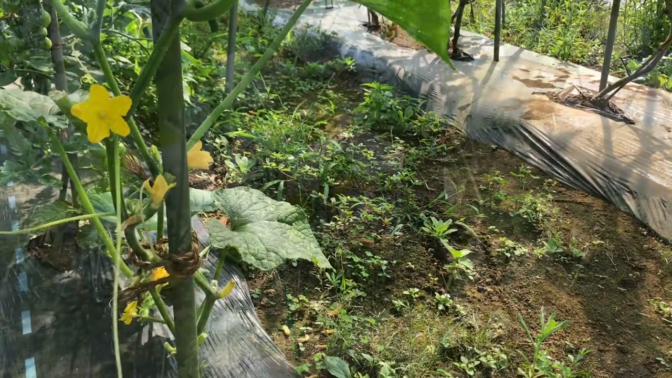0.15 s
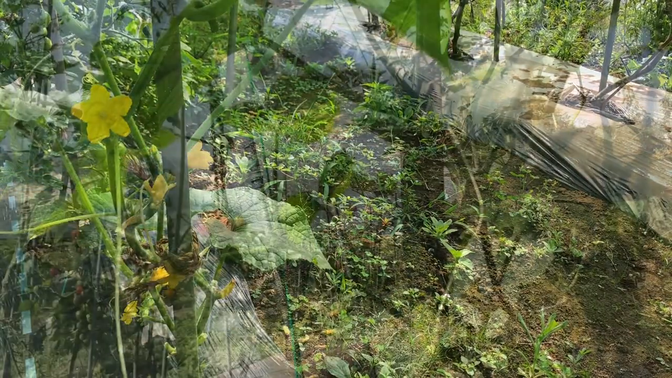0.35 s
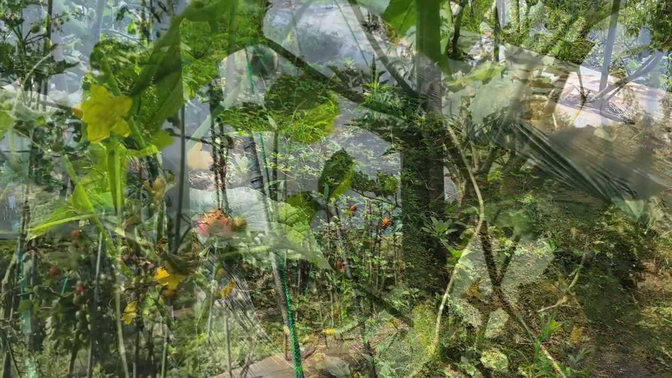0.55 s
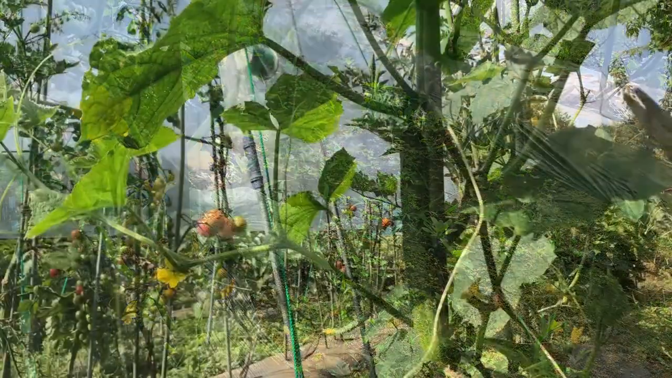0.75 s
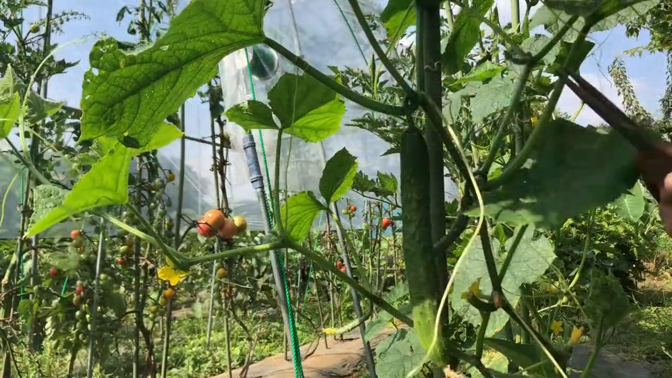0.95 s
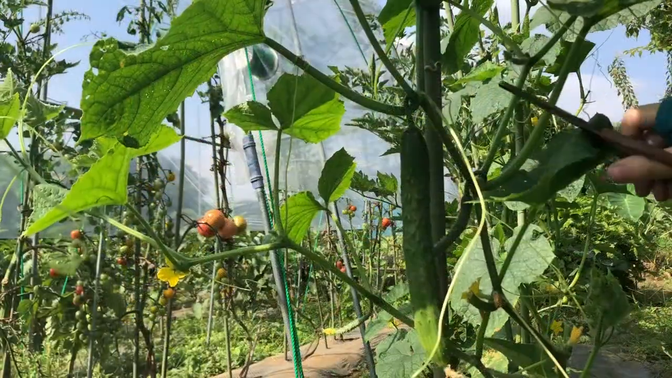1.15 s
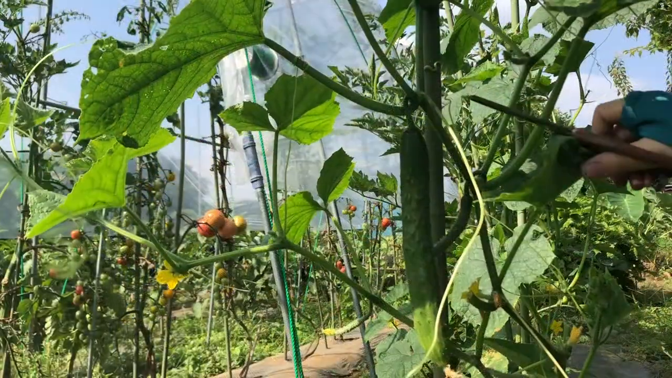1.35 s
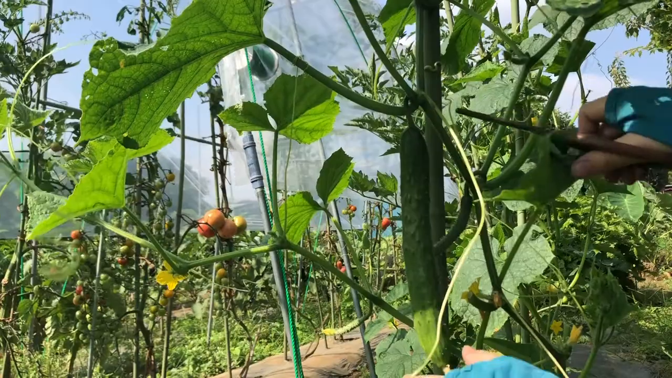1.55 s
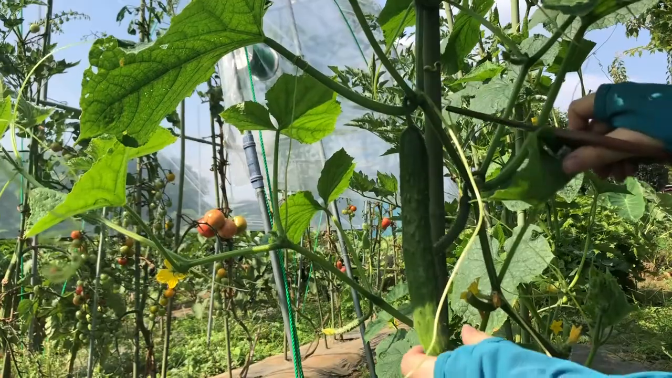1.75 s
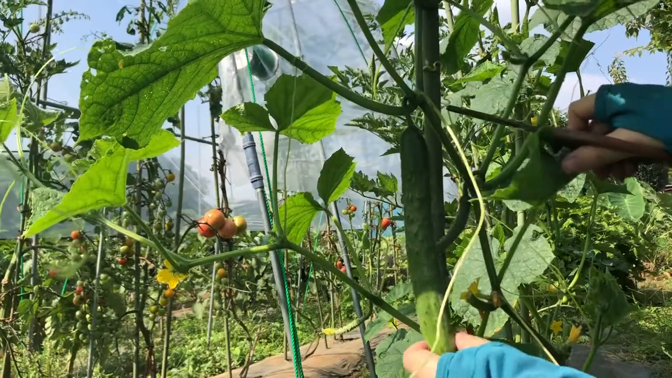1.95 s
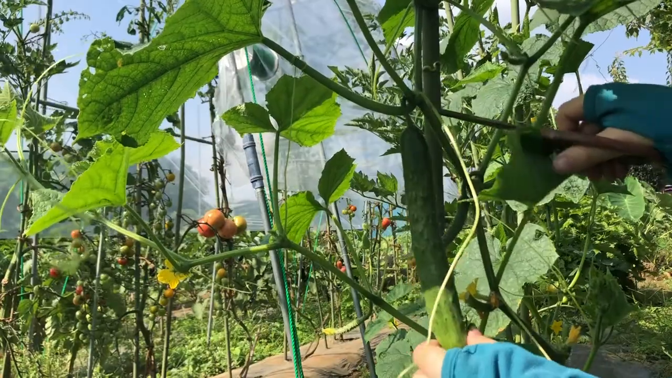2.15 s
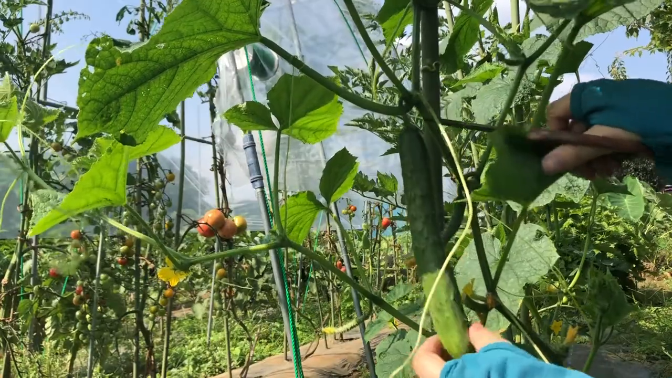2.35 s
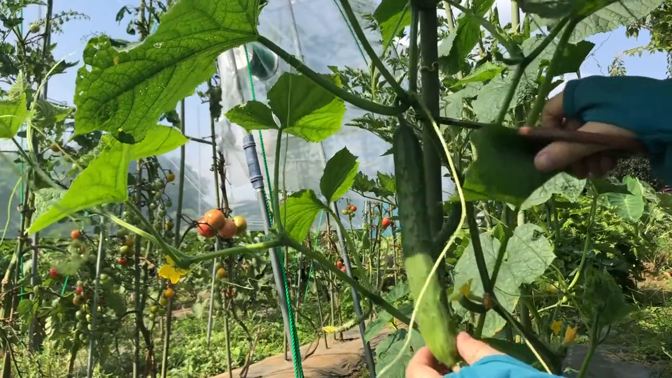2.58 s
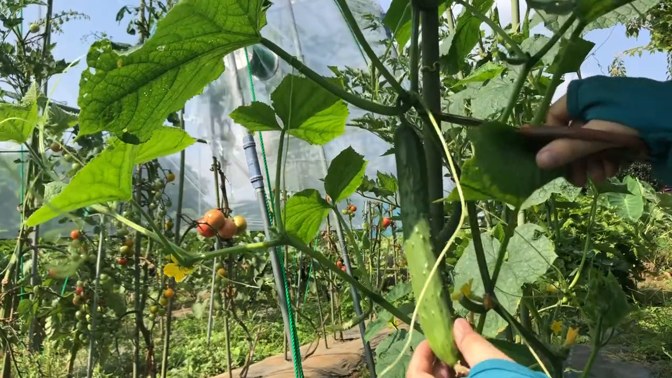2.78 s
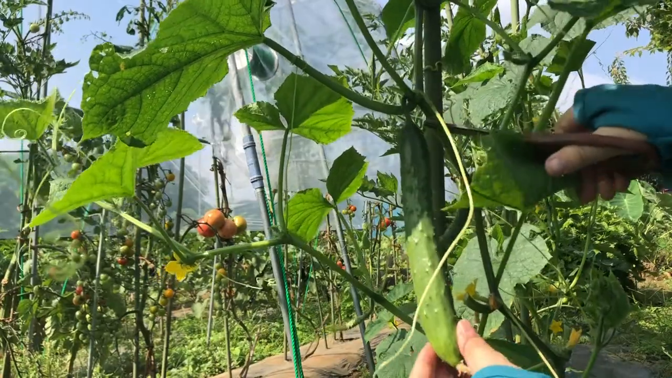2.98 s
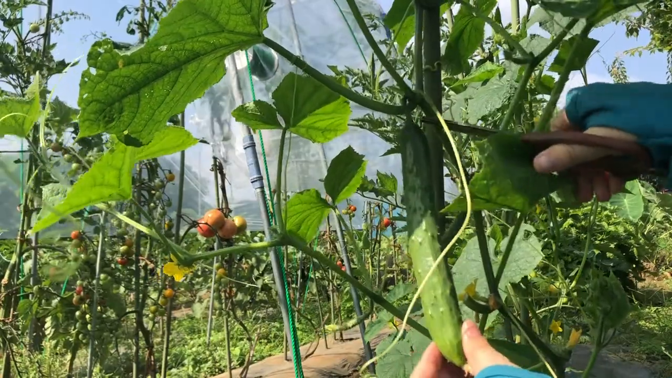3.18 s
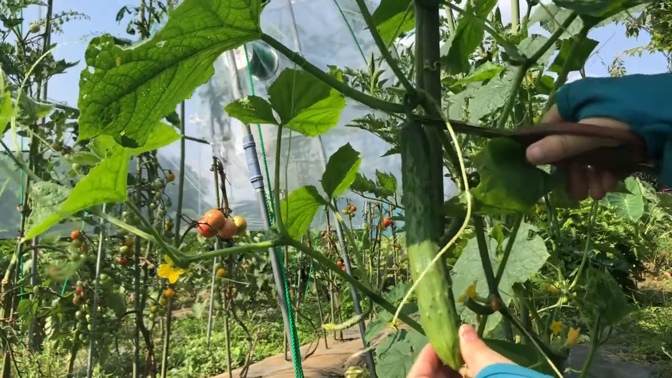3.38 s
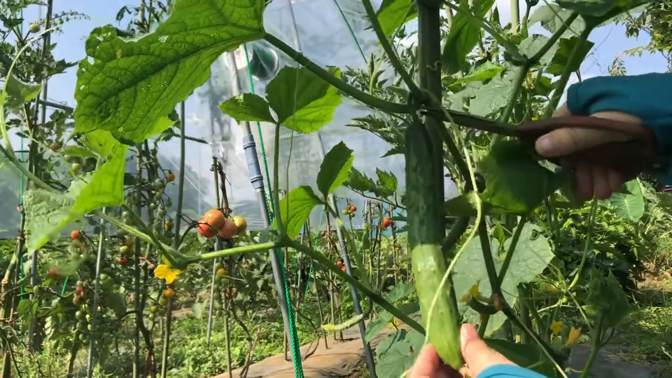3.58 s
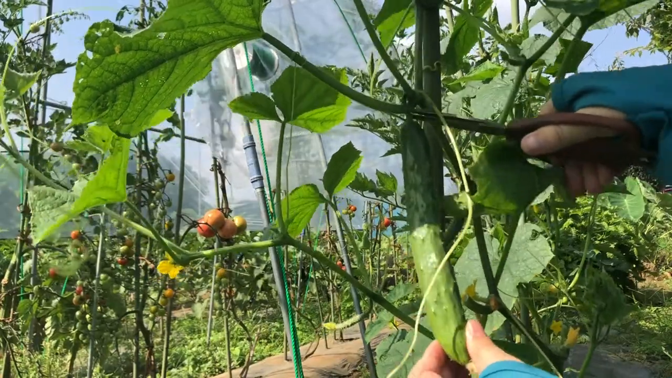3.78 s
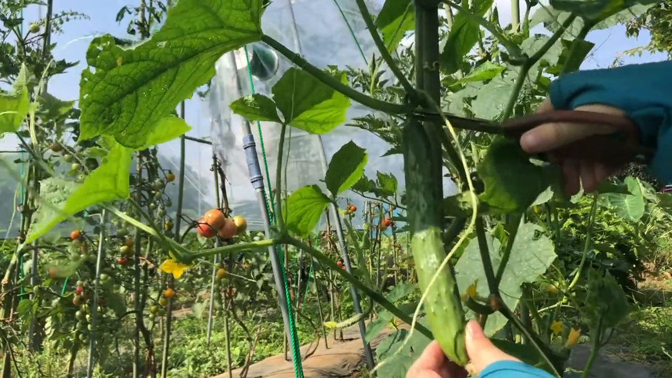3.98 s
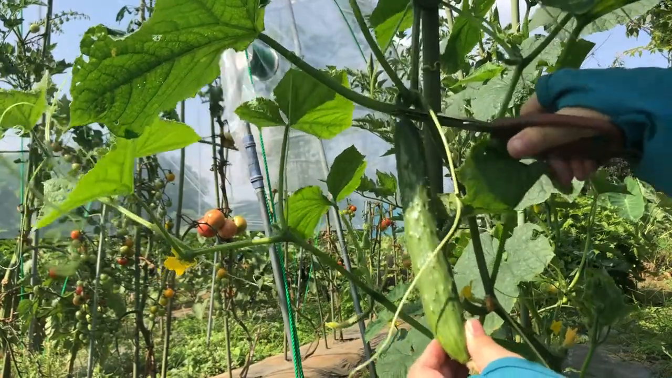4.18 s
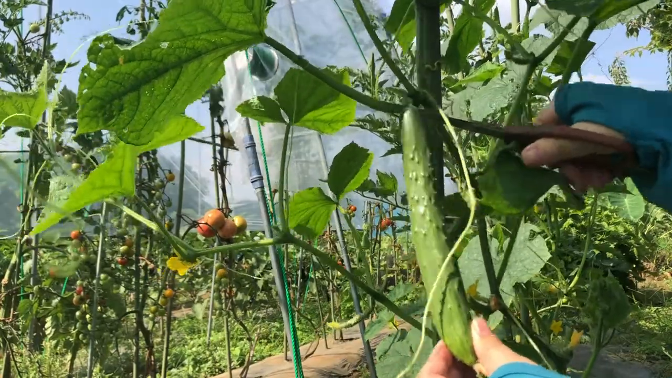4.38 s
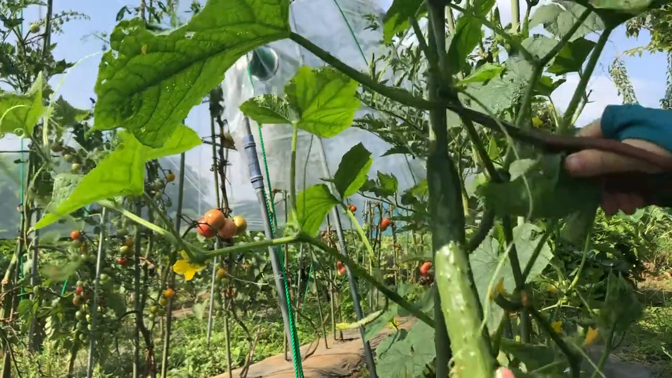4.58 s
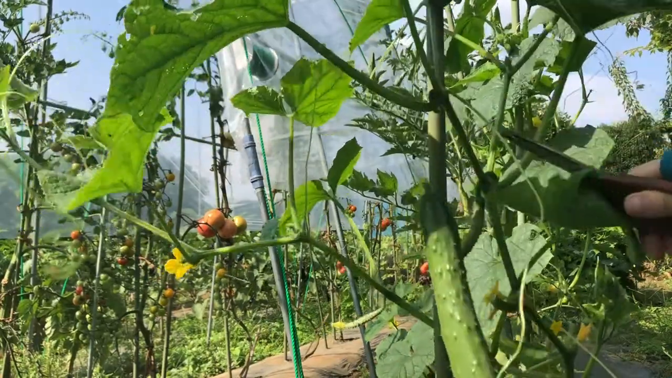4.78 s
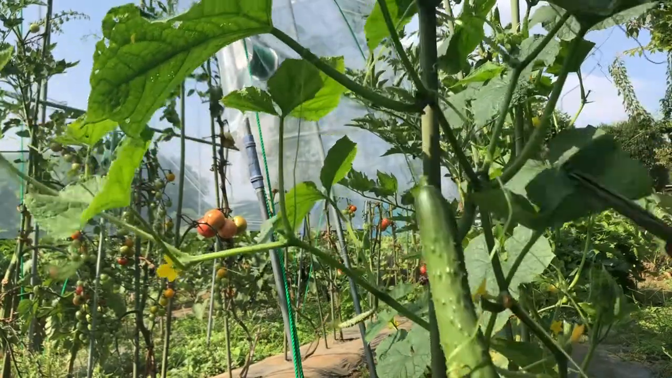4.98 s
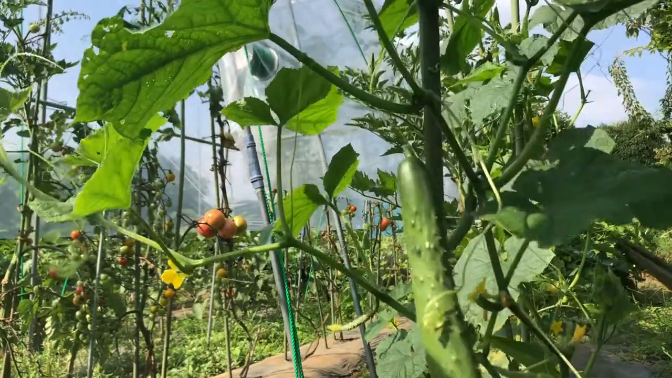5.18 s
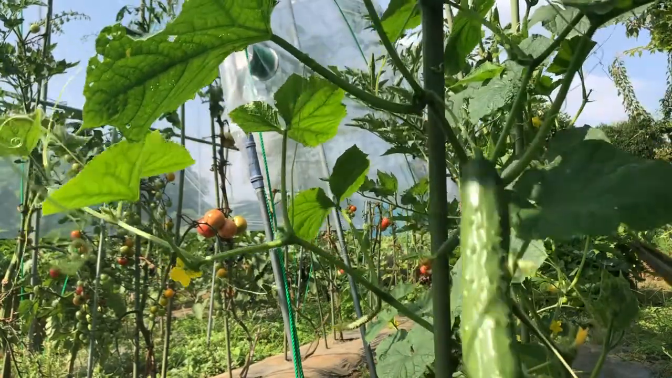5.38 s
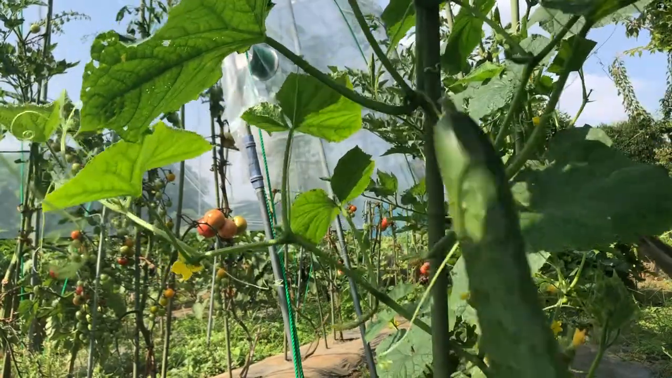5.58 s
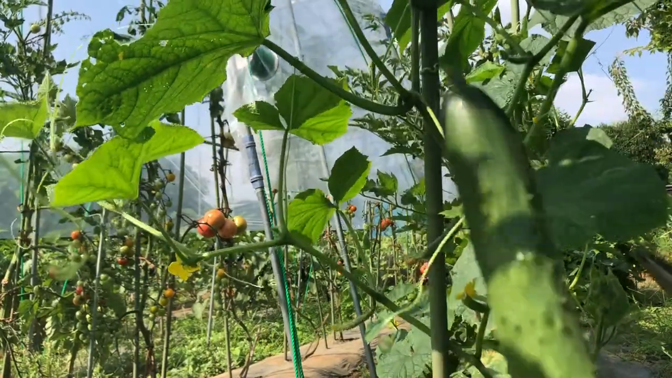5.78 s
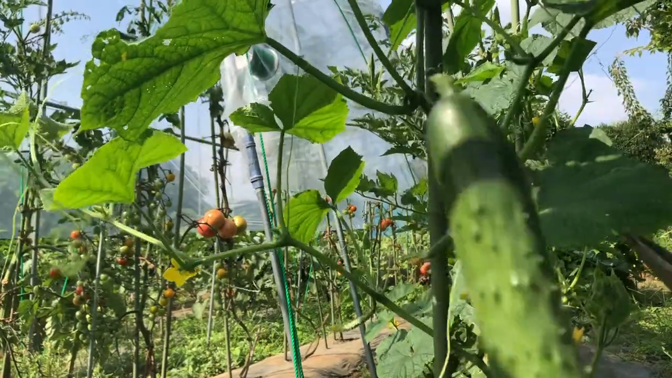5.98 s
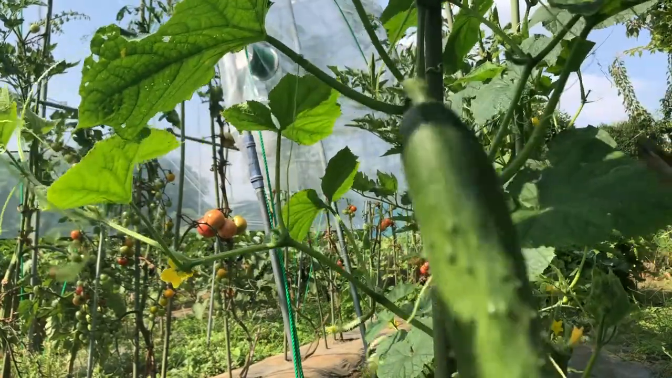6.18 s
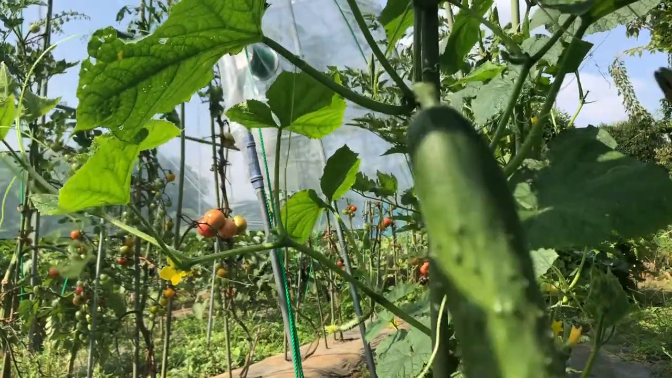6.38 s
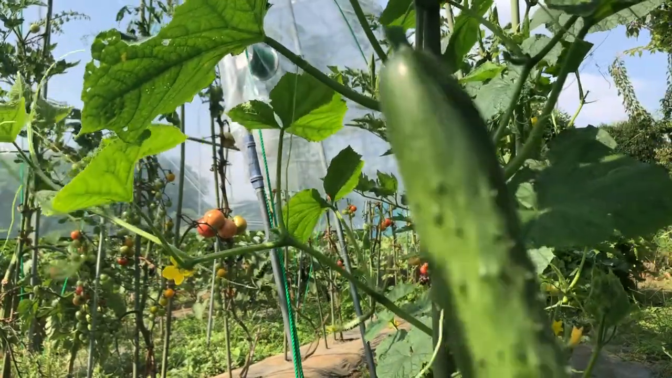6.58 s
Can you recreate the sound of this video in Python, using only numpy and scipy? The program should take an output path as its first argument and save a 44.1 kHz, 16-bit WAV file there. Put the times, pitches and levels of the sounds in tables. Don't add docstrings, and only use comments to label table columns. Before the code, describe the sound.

Faint coo and distant road under constant insect chirring, dry rustling of leaves and creaking vine, a single loud metallic snip, then quiet.

```python
import sys
import numpy as np
from scipy import signal
from scipy.fft import rfft, irfft, next_fast_len
from scipy.io import wavfile
from scipy.ndimage import uniform_filter1d, map_coordinates

SR = 44100
rng = np.random.default_rng(int(sys.argv[2]) if len(sys.argv) > 2 else 0)


def boost_factor(decibels):
    exponent = np.asarray(decibels, float) / 20
    return 10 ** exponent


def transcribe(signal):
    frames = np.atleast_2d(signal).T
    limited = np.clip(frames, -1, 1)
    pcm = np.round(limited * 32767).astype(np.int16)
    wavfile.write(sys.argv[1], SR, pcm)


N = 292691
STEP = 20

# frequency in Hz, level in dB.
PUMP_LINES = [(200, -59.5), (168, -63.5), (75, -66)]
# frequency in Hz, density in dB per Hz.
CICADA_COLOUR = [(2470, -67), (4200, -41), (4670, -27), (5080, -13.5), (5160, -12.5), (5640, -3.5),
                 (8170, -0.5), (9280, -7), (10300, -22.5), (10800, -30), (11500, -46), (15000, -68),
                 (22000, -120)]
# frequency in Hz, density in dB per Hz.
RUMBLE_COLOUR = [(20, -50), (32, -24), (43, -3), (102, -1), (133, -4.5), (155, -4), (185, -7), (214, -9),
                 (226, -14), (257, -10), (330, -23), (430, -48)]
# frequency in Hz, density in dB per Hz.
TYRE_COLOUR = [(250, -11), (450, -7.5), (1000, 2), (1700, -1), (2200, -6.5), (3200, -22)]
# middle moment in seconds, level in dB, time to lose 10 dB in seconds.
TYRE_SWELLS = [
    (.3, -66, 0.58),
    (6.08, -70.5, 0.2),
]
# frequency in Hz, density in dB per Hz.
WASH_COLOUR = [(150, -29), (250, -1.5), (400, -2.5), (900, -8.5), (2000, -14), (4300, -20.5),
               (10000, -22.5), (13000, -29.5), (15800, -29)]
# start in seconds, length in seconds, pitch in Hz, level in dB.
COO_NOTES = [(.525, .045, 975, -62), (.585, .025, 1010, -69), (.645, .02, 1200, -70),
             (.68, .065, 1060, -61), (.755, .045, 1130, -64), (.848, .015, 1170, -65)]
# start in seconds, length in seconds, level in dB.
LEAF_STIRS = [(.25, .08, -79), (.43, 0.045, -84), (.57, 0.023, -77), (.66, 0.097, -78), (0.813, 0.018, -78),
              (1.93, .12, -80), (5.026, 0.19, -78), (5.38, .004, -78), (5.836, 0.084, -78),
              (6.012, 0.1, -75)]
# start in seconds, length in seconds, level in dB, pressure in dB.
LEAF_STROKES = [(.095, 0.091, -72.5, 5.3), (.93, 0.19, -70, 0.5), (1.13, .04, -73, 6),
                (1.18, 0.044, -70.5, 8.5), (1.29, 0.15, -75, 3), (1.55, 0.14, -71, -2),
                (1.7, 0.051, -67, 0), (2.055, 0.13, -58, -3.5), (2.235, 0.057, -59.5, -3.5),
                (2.345, 0.076, -58, -7.5), (2.46, .24, -66, -3.5), (2.78, 0.096, -64.5, 3.5),
                (2.89, .16, -74, -2), (3.14, 0.062, -66, 0), (3.23, 0.036, -69, -5),
                (3.28, 0.055, -65.5, 2), (3.39, 0.11, -79, -2), (3.53, 0.1, -67.5, 0),
                (3.69, 0.11, -74, 0.5), (3.89, 0.046, -77, -4), (3.99, 0.071, -70, 1.5),
                (4.11, 0.15, -66.5, 4.5), (4.36, 0.1, -74.5, 2), (4.475, 0.024, -68.5, -2),
                (4.52, 0.1, -74.5, 4), (4.655, 0.056, -68, 3), (4.73, .08, -64.5, -1),
                (4.81, 0.078, -61.5, 0.5), (4.915, 0.077, -62, 5.5)]
# frequency in Hz, density in dB per Hz.
HAIR_COLOUR = [(3000, -30), (6000, -10.5), (9000, 2.5), (12000, 1), (14500, -0.5), (16500, 2.5)]
# frequency in Hz, density in dB per Hz.
LEAF_COLOUR = [(2400, -13.5), (3300, -10.5), (3800, -0.5), (4300, 0), (5200, 0.5), (7000, -4.5),
               (10000, -36)]
# frequency in Hz, density in dB per Hz.
STALK_COLOUR = [(400, -30), (700, -1.5), (1200, -1.5), (2000, 0), (2800, -3.5), (3400, -8), (4300, -48)]
# time in seconds, peak in dB, ring in Hz.
LEAF_TICKS = [(0.978, -45.5, 1670), (1.707, -44, 3070), (3.455, -49, 2700), (2.0407, -31, 5070),
              (3.67, -50, 2800), (2.1066, -37, 4690), (2.244, -44.5, 3200), (2.281, -36, 4700),
              (2.4119, -35, 5080), (2.428, -40, 3910), (2.693, -35, 5000), (2.819, -42, 4200),
              (2.8399, -41, 4800), (3.168, -50, 4050), (3.2974, -41, 4000), (3.4017, -48, 4200),
              (3.558, -41, 3990), (3.6227, -37, 4700), (3.7544, -46, 4440), (4.0692, -47.5, 2430),
              (4.1314, -33, 4760), (4.3874, -49.5, 3880), (4.4263, -48, 5170), (4.494, -48.5, 1950),
              (4.558, -44, 3930), (4.5853, -40.5, 4060), (4.8214, -46, 3600), (4.919, -46, 4830),
              (4.938, -45, 2800), (4.968, -36, 2880)]
# start in seconds, end in seconds, level in dB.
VINE_CREAKS = [(2.048, 2.201, -48), (2.799, 2.92, -49), (3.439, 3.85, -50), (3.992, 4.12, -50),
               (4.34, 4.651, -51), (4.81, 5.0, -47)]
# time in seconds, level in dB.
FIBRE_TEAR = [(4.2228, -75), (4.2242, -38), (4.2300, -42), (4.2310, -25), (4.2326, -24), (4.2330, -31),
              (4.2375, -37), (4.242, -60)]
# frequency in Hz, density in dB per Hz.
TEAR_COLOUR = [(350, -51), (600, -11), (2030, -6), (3210, -3), (6000, -4), (9740, -1.5), (11500, -2),
               (15400, -14), (16500, -26)]
# time in seconds, level in dB, frequency in Hz, cycles to fade 20 dB.
BLADE_CONTACTS = [(4.23052, -8, 11000, 2.5), (4.23072, -2, 7600, 3.5), (4.23088, 3, 6200, 3.5),
                  (4.23080, -9.5, 2130, 5.5), (4.23082, -7, 11600, 8), (4.2309, -10, 4020, 7),
                  (4.2308, -18, 1500, 3), (4.23080, -12.5, 2420, 4), (4.2309, -10, 5250, 4),
                  (4.2312, -9, 9200, 5), (4.2308, -14, 15100, 8), (4.2319, -12, 6500, 4),
                  (4.2322, -12, 7600, 4)]
# frequency in Hz, width in Hz, level in dB.
STEEL_MODES = [(2200, 400, -4), (4130, 260, -2), (6460, 1100, -13), (7800, 230, 17), (7710, 140, -20),
               (8900, 410, 13), (9700, 220, -11), (10330, 200, -12), (10600, 270, 10), (11600, 550, 15.5),
               (13700, 310, 6), (15000, 280, 5)]
# frequency in Hz, density in dB per Hz.
ECHO_COLOUR = [(290, -47), (500, -5), (1200, -23), (2230, -7), (5310, -13), (6000, -1), (11300, -5),
               (15400, -18), (15800, -48)]


def unit(x):
    return x / np.sqrt(np.mean(x ** 2) + 1e-20)


def wobble(rate):
    knots = rng.standard_normal(int(N * rate / SR) + 4)
    return map_coordinates(knots, [np.arange(N) * rate / SR])


def filtered(x, response):
    m = next_fast_len(N + 8192)
    return irfft(rfft(x, m) * response(np.fft.rfftfreq(m, 1 / SR)), m)[:N]


def hiss(colour, source=None):
    f, db = np.transpose(colour)
    if source is None:
        source = rng.standard_normal(N)

    def gain(hz):
        return boost_factor(np.interp(np.log(hz + 1), np.log(f), db, left=-120, right=-120))
    return unit(filtered(source, gain))


def held(start, length, rise, fall):
    t = np.arange(0, N, STEP) / SR - start
    return np.minimum(0, np.minimum(rise * t, fall * (length - t)))


def filled(coarse):
    return np.interp(np.arange(N), np.arange(0, N, STEP), coarse)


def gliding_level(early_db, late_db):
    return np.interp(np.arange(N) / SR, (.55, .95), (early_db, late_db))


def pump():
    t = np.arange(N) / SR
    return sum(boost_factor(db + 1.5 * wobble(4)) * np.sin(2 * np.pi * hz * t + .35 * wobble(6))
               for hz, db in PUMP_LINES)


def cicadas():
    pulse_hz = 520 + 6 * wobble(5.6)
    buzz = 1 + .12 * np.sin(2 * np.pi * np.cumsum(pulse_hz) / SR)
    return boost_factor(gliding_level(-57, -53.5) + .25 * wobble(9.8)) * buzz * hiss(CICADA_COLOUR)


def traffic():
    t = np.arange(N) / SR
    rumble = boost_factor(gliding_level(-51, -55) - 2.5 + .6 * wobble(5)) * hiss(RUMBLE_COLOUR)
    swell = sum(boost_factor(db - 10 * ((t - s) / width) ** 4) for s, db, width in TYRE_SWELLS)
    tyres = swell * hiss(TYRE_COLOUR)
    wash = boost_factor(gliding_level(-69.5, -71.5) + 5 + 1.3 * wobble(6.6)) * hiss(WASH_COLOUR)
    return rumble + tyres + wash


def bird():
    start, length, hz, db = np.transpose(COO_NOTES)[..., None]
    edge_db_per_s, rise_hz_per_s, waver_hz = 1600, 400, 30
    gain = boost_factor(db + held(start, length, edge_db_per_s, edge_db_per_s))
    note = gain.argmax(0)
    before_start = held(start, 0, 1, -1)[note, np.arange(len(note))]
    pitch = hz[note, 0] + rise_hz_per_s * before_start
    turn = 2 * np.pi * np.cumsum(filled(pitch) + waver_hz * wobble(60)) / SR
    direct = (1.1 + .65 * wobble(140)) * np.sin(turn)
    scattered = .5 * wobble(140) * np.cos(turn)
    return filled(gain.sum(0)) * (direct + scattered)


def grit(rate, spread_db, life, smooth):
    slipping = rng.random(N) < rate / SR
    slips = slipping * boost_factor(spread_db * np.minimum(rng.exponential(size=N), 5))
    shape = signal.lfilter([1], [1, -np.exp(-1 / (life * SR))], slips)
    return rng.standard_normal(N) * (smooth + unit(shape))


def leaf_rub():
    rows = [tuple(row) for row in LEAF_STROKES]
    rows.append((-1, N / SR + 1, -87, 4.5))
    rows += [(*row, .5) for row in LEAF_STIRS]
    attack_db_per_s, release_db_per_s = 800, 306
    touch = boost_factor([db + held(s, length, attack_db_per_s, release_db_per_s) for s, length, db, _ in rows])
    press_db = np.array(rows)[:, -1]

    def lumpy(gain_db):
        return filled(boost_factor(gain_db) @ touch) * boost_factor(2 * wobble(35))

    slips = grit(rate=900, spread_db=2.8, life=.0006, smooth=1.0)
    hairs = lumpy(2.5 + 0 * press_db) * hiss(HAIR_COLOUR, slips)
    leaf = lumpy(press_db + 1.0) * hiss(LEAF_COLOUR, slips)
    stalk = lumpy(1.55 * press_db - 8.5) * hiss(STALK_COLOUR, slips)
    return hairs + leaf + stalk


def creaks():
    gap_s, centre_hz, spread = .022, 4200, .14
    rows = [(s, db) for start, end, db in VINE_CREAKS for s in np.arange(start, end, gap_s)]
    luck = rng.standard_normal((len(rows), 3))
    return [(s + .3 * gap_s * a, db + 3 * b, centre_hz * np.exp(spread * c))
            for (s, db), (a, b, c) in zip(rows, luck)]


def ticks():
    out = np.zeros(N + SR)
    t = np.arange(SR // 50) / SR
    crackle = hiss(HAIR_COLOUR)
    for s, db, hz in [*LEAF_TICKS, *creaks()]:
        at = round(s * SR)
        ring = np.sin(2 * np.pi * hz * t) * boost_factor(-60 * t / (10 / hz))
        ring *= 1 - np.exp(-t / .00014)
        hairs = boost_factor(-16 - 60 * t / .004) * crackle[at // 2:][:len(t)]
        out[at:][:len(t)] += boost_factor(db + 4.5) * (ring + hairs)
    return out[:N]


def patchy(x, depth_db):
    z = signal.stft(x, nperseg=1024)[2]
    field = uniform_filter1d(rng.standard_normal(z.shape), size=5, axis=0)
    field = uniform_filter1d(field, size=4, axis=1)
    return signal.istft(z * boost_factor(depth_db * unit(field)), nperseg=1024)[1][:N]


def fibres():
    s, db = np.transpose(FIBRE_TEAR)
    level = np.interp(np.arange(N) / SR, s, db, left=-120, right=-120)
    return boost_factor(level) * hiss(TEAR_COLOUR)


def blade_contacts():
    clock, out = np.arange(N) / SR, np.zeros(N)
    for s, db, hz, cycles in BLADE_CONTACTS:
        near = slice(int(s * SR), int(s * SR) + SR // 20)
        t = np.maximum(clock[near] - s, 0)
        fade = boost_factor(db - 20 * t * hz / cycles)
        out[near] += (1 - np.exp(-t * hz)) * fade * np.sin(2 * np.pi * hz * t)
    return out


def steel_ring(snap_s):
    blow = np.zeros(N)
    blow[round(snap_s * SR)] = 1

    def modes(f):
        return sum((-1) ** k * boost_factor(db) * 1j * f * width / (hz * hz - f * f + 1j * f * width)
                   for k, (hz, width, db) in enumerate(STEEL_MODES))
    return boost_factor(-6.5) * filtered(blow, modes)


def foliage_echo(t):
    decay = boost_factor(-30.0 - 60 * t / .048) + boost_factor(-49.5 - 60 * t / .17)
    return (1 - np.exp(-t / .00067)) * decay * hiss(ECHO_COLOUR)


def stake_thump(t):
    low = np.sin(2 * np.pi * 340 * t)
    high = boost_factor(-3 - 60 * t / .07) * np.sin(2 * np.pi * 570 * t)
    return boost_factor(-38 - 60 * t / .065) * (1 - np.exp(-t / .0018)) * (low + high)


def shears():
    snap_s = BLADE_CONTACTS[1][0]
    t = np.maximum(np.arange(N) / SR - snap_s, 0)
    cut = blade_contacts() + steel_ring(snap_s) + fibres()
    small = signal.butter(3, 1050, 'high', fs=SR, output='sos')
    cut = signal.sosfilt(small, cut) + foliage_echo(t) + stake_thump(t)
    return filtered(cut, lambda hz: 1 / (1 + (hz / 16200) ** 60))


def scene():
    surroundings = cicadas() + traffic() + leaf_rub() + ticks()
    garden = patchy(surroundings, depth_db=1.5) + bird() + pump()
    return (filtered(garden, lambda hz: hz < 15800) + shears())[None]


def roll_off(x):
    return signal.sosfilt(signal.butter(12, 16960, fs=SR, output="sos"), x)


def record(dry):
    return roll_off(dry)


dry = scene()
out = record(dry)
transcribe(out)
```